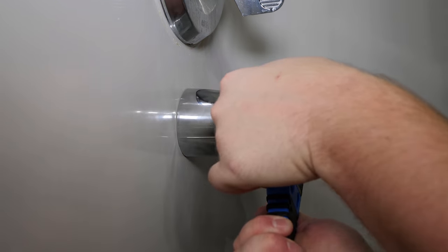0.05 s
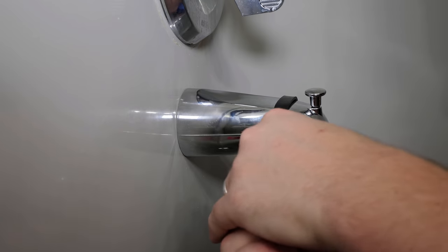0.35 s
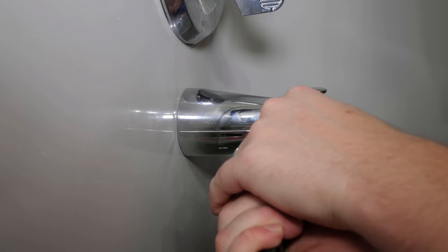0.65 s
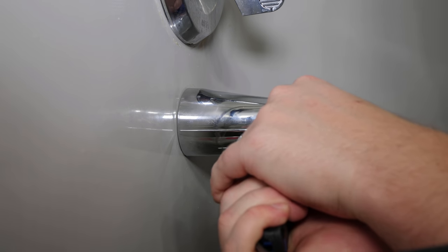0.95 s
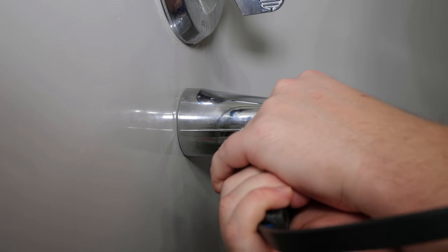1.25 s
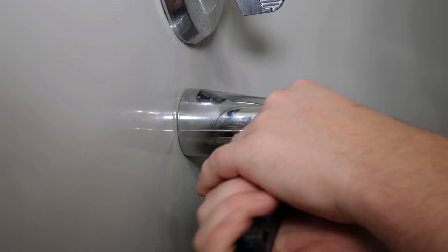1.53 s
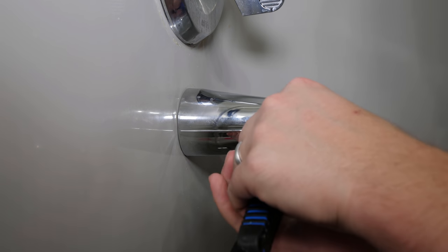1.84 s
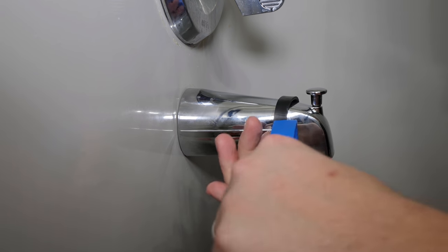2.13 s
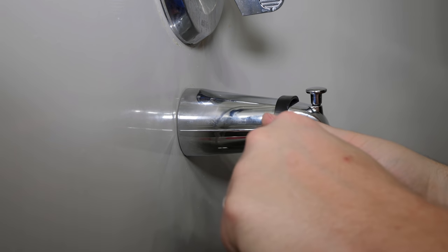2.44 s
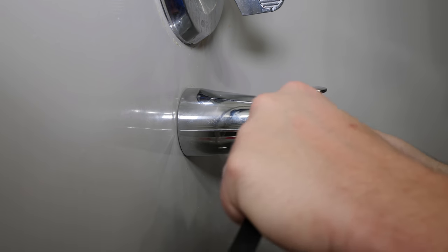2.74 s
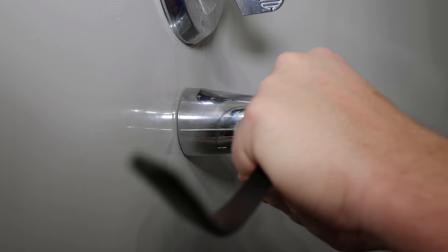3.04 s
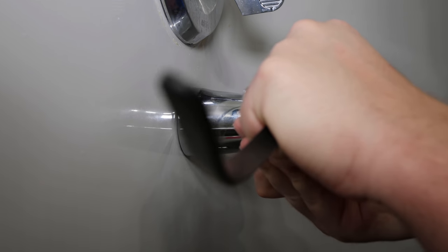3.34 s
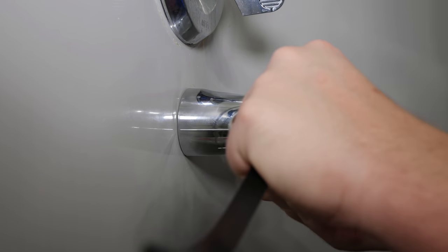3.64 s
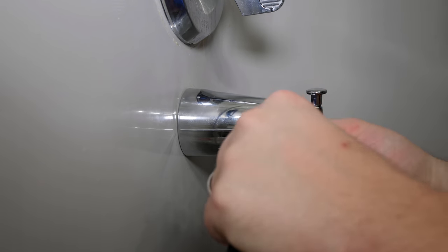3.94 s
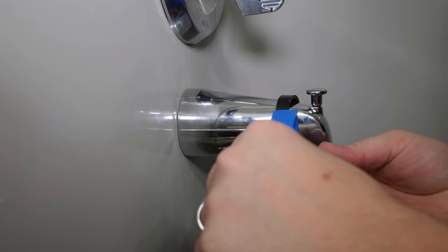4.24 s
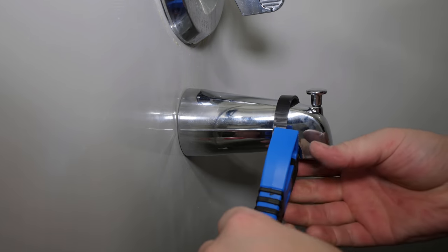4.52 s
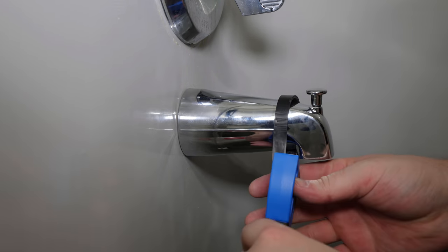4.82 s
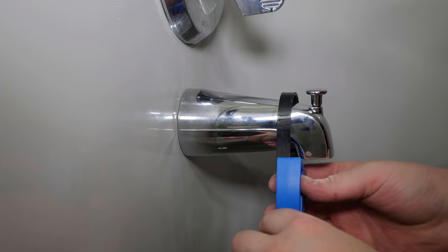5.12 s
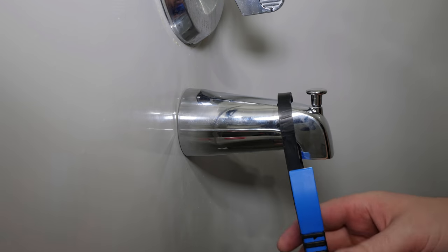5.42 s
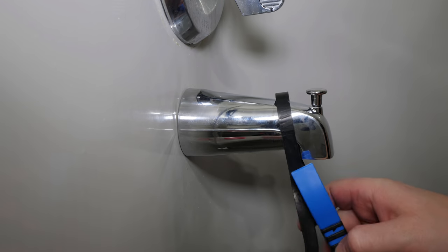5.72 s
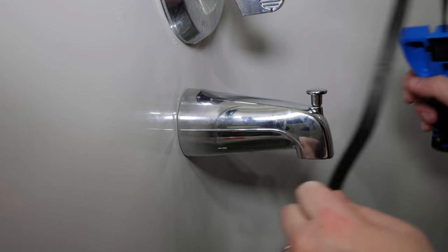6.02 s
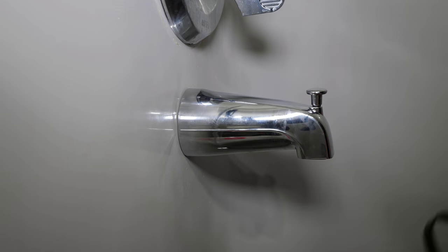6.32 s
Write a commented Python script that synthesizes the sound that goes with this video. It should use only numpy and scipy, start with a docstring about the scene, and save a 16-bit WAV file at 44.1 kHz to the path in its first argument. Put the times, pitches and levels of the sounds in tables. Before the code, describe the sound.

A rubber strap wrench creaks and ticks on a metal tub spout, with hand rubs, soft knocks and hollow chinks in a small bathroom.

```python
"""Short rubbery creaks and plastic ticks, close to the microphone in a small bathroom: a strap wrench
is tightening a chrome tub spout. The loaded strap slips and jolts the pipe, the handle chatters, and
hands rub and bump the tool. The hollow spout chinks as the wrench is reset and pulled off.
Behind it all, the tub alcove booms softly over a faint room drone."""
import sys
import numpy as np
from scipy import signal
from scipy.fft import rfft, irfft
from scipy.io import wavfile

SR = 44100
rng = np.random.default_rng(int(sys.argv[2]) if len(sys.argv) > 2 else 0)


def dump(signal):
    """Clip the signal to [-1, 1] and save it as 16-bit WAV at the path in sys.argv[1]."""
    limited = np.clip(np.atleast_2d(signal).T, -1, 1)
    pcm = np.round(limited * 32767).astype(np.int16)
    wavfile.write(sys.argv[1], SR, pcm)


N = 285327

# Event levels are set ahead of the mix gains and the room.
# the strap slips under load and jolts the pipe:
# (time [s], creak level [dB], length [s], dull above [Hz], jolt level [dB], jolt centre [Hz])
STRAP_SLIPS = [(0.073, -43.5, 0.012, 2600, -61, 1030), (0.095, -46, 0.017, 3500, -58.5, 288),
               (0.325, -53.5, 0.017, 2600, -54, 164), (0.518, -58, 0.016, 5000, -50.5, 1400),
               (0.567, -41, 0.024, 1810, -45.5, 305), (0.633, -37.5, 0.022, 2800, -49, 890),
               (0.648, -38, 0.03, 3340, -46.5, 320), (0.764, -49.5, 0.0059, 900, -46, 254),
               (0.798, -57.5, 0.009, 1010, -54.5, 480), (0.971, -51.5, 0.0081, 694, -48.5, 736),
               (1.257, -48.5, 0.011, 500, -54.5, 220), (1.2677, -48.5, 0.01, 2290, -56.5, 1100),
               (1.288, -51, 0.018, 2480, -56, 440), (1.306, -54.5, 0.025, 2000, -49.5, 205),
               (1.89, -55.5, 0.049, 6190, -55.5, 570), (3.809, -48, 0.037, 1960, -54, 224),
               (3.835, -37, 0.024, 1930, -37, 350), (3.869, -45, 0.026, 2000, -44, 440),
               (4.39, -59, 0.0032, 700, -57, 244), (4.449, -59, 0.016, 700, -55.5, 274),
               (5.844, -63, 0.036, 2500, -54.5, 516), (6.304, -47, 0.027, 1600, -49, 270),
               (6.398, -55.5, 0.062, 1500, -55, 480)]
# the slack strap whisks over the chrome: (time [s], level [dB], length [s])
STRAP_WHISKS = [(4.093, -65, 0.014), (4.675, -65.5, 0.026), (5.410, -65.5, 0.018), (5.697, -59, 0.044),
                (5.837, -55, 0.033), (6.447, -46, 0.003)]
# the plastic handle ticks: (time [s], level [dB])
HANDLE_TICKS = [(.020, -60.5), (0.1533, -48), (0.172, -50.5), (0.2037, -48), (.210, -55), (0.5208, -53.5),
                (.8595, -60), (1.3866, -47.5), (1.465, -58.5), (1.5051, -53), (1.554, -55.5), (1.5896, -52),
                (1.6736, -57.5), (1.713, -60), (2.4439, -59.5), (3.045, -73), (3.231, -71), (3.4218, -70),
                (3.509, -67.5), (3.5768, -61), (4.019, -62.5), (4.1, -65), (6.26, -53.5)]
# hands and tool bump the spout: (time [s], level [dB], centre [Hz], shudder [s])
SPOUT_BUMPS = [(.976, -47.5, 195, 0.0035), (0.996, -48.5, 276, 0.026), (1.309, -50.5, 229, 0.0098),
               (1.326, -51, 480, 0.03), (2.1588, -41.5, 880, 0.013), (2.165, -53.5, 605, 0.047),
               (2.18, -41.5, 211, 0.016), (2.367, -58, 162, 0.023), (2.9161, -63.5, 274, 0.007),
               (4.522, -59.5, 212, 0.0081), (4.557, -58, 217, 0.02), (4.734, -60.5, 206, 0.012),
               (4.9435, -55.5, 250, 0.024), (4.971, -56.5, 235, 0.043), (5.906, -48.5, 910, 0.021),
               (5.928, -51, 613, 0.016), (5.935, -49.5, 203, 0.021), (6.0743, -57, 235, 0.0074),
               (6.131, -56.5, 244, 0.055), (6.205, -54.5, 550, 0.25), (6.345, -47.5, 466, 0.067)]
# the wrench touches the spout:
# (time [s], level [dB], best excited [Hz], spread [octaves], free ring time [share], crack to ring [dB])
SPOUT_CHINKS = [(2.1585, -44, 4780, 0.3, 0.58, -4.5), (2.1588, -46, 10400, 0.23, 0.9, -2.5),
                (2.445, -62.5, 3000, 0.25, 0.43, -10), (4.5535, -61, 4500, 0.79, 0.8, -8),
                (5.8802, -45.5, 3120, 0.093, 1, -21), (5.882, -58, 6700, 0.29, .8, -7),
                (5.906, -43.5, 1900, 0.58, 1, -10), (5.906, -59, 6140, 0.29, 0.39, -3),
                (5.924, -49, 6400, 0.31, 1, -9), (5.927, -50, 820, 0.15, 0.85, -13)]
# a hand slides to a new grip: (fastest at [s], rise [s], fall [s], hiss [dB], scuff [dB], flex [dB])
HAND_STROKES = [(.27, 0.24, 0.24, -59.5, -60.5, -64), (.72, 0.2, 0.12, -68.5, -57.5, -65),
                (1.31, 0.12, 0.3, -68, -64.5, -69), (1.57, 0.051, 0.11, -58, -62, -59.5),
                (1.845, 0.062, 0.26, -56, -70, -63), (2.061, 0.064, 0.14, -51, -60, -55.5),
                (2.345, 0.026, 0.16, -67, -67.5, -66.5), (3.15, 0.13, .14, -83, -88, -68.5),
                (3.52, 0.05, 0.14, -76, -67, -86), (4.108, 0.06, 0.039, -53.5, -71, -60.5),
                (4.28, 0.55, 0.44, -65.5, -70, -66.5), (5.39, 0.15, 0.11, -68, -67.5, -85),
                (5.78, 0.44, 0.27, -70, -76, -60.5), (6.181, 0.11, 0.11, -56, -59.5, -80),
                (6.441, 0.13, 0.068, -54.5, -52, -50)]
# hands that only hold the tool: (hiss [dB], scuff [dB], flex [dB])
RESTING_GRIP_DB = (-80, -73.5, -80)

# modes of the hollow spout: (frequency [Hz], level [dB], t60 [s])
SPOUT_MODES = [(830, -5, .35), (900, -7, .3), (1800, 1, .64), (1938, -3, .66), (3120, 1, .31),
               (3227, -2, .45), (3553, -13, .45), (4113, -4, .2), (4501, -3, .28), (4527, -6, .33),
               (4678, -4, .28), (5087, -7, .28), (5157, -9, .2), (5319, -10, .14), (6126, -11, .17),
               (6923, -10, .36), (7306, -8, .2), (7916, -3, .32), (8250, -11, .2), (9200, -13, .2),
               (10200, -4, .14), (10700, -8, .14)]
# standing waves of the tub alcove: (frequency [Hz], peak gain [dB], t60 [s])
ALCOVE_MODES = [(192.7, -6, 0.32), (227.7, 9, 0.19), (283, -11, 0.26), (375, 2, 0.31), (460.6, 10, 0.28),
                (616, 0.5, 0.031), (686.6, -5.5, 0.11), (1100, -8, 0.071), (1160, -17, 0.25),
                (1475, -17, 0.14)]
# faint ring of the spout under sliding hands: (frequency [Hz], width [Hz], peak gain [dB])
RUBBED_SPOUT_PEAKS = [(5130, 260, 1), (8200, 260, -3)]

# tone colours: (frequency [Hz], relative level [dB])
ROOM_TONE_COLOUR = [(15, -34), (25, -21), (148, -62), (173, -6), (305, -25.5), (349, 1.5), (399, -11.5),
                    (457, -22), (495, -14), (582, -10), (1080, -23.5), (1490, -19.5), (2360, -26.5),
                    (5580, -21.5), (15500, -24.5)]  # the still bathroom
PORT_DIFFERENCE = [(100, -39), (300, 3), (600, 0.5), (1200, 7.5), (2200, 15), (5000, 13.5), (9000, 12.5),
                   (15000, -11)]  # how much the two microphone ports differ
SKIN_COLOUR = [(300, -18.5), (1000, -4), (1400, -6), (2200, 2), (3500, 3), (5200, 0), (7000, 1),
               (10000, -2.5), (15000, -1.5)]  # sliding skin
SCUFF_COLOUR = [(40, -49), (150, -4), (350, 7), (650, 1.5), (1300, -4.5), (2000, 3), (3200, -11),
                (5000, -10.5), (12000, -20)]  # catching skin
FLEX_COLOUR = [(25, -49), (60, -38), (85, -20.5), (105, -9.5), (130, 2.5), (210, 7.5), (300, -5.5),
               (500, -19.5), (1200, -28)]  # the flexing pipe
WALL_COLOUR = [(30, -32), (70, -10), (125, -5), (210, -7), (1000, -7.5), (1400, -21.5), (15000, 39)]  # the shaken wall panel
HANDLE_COLOUR = [(100, -17), (250, -4.5), (800, -2), (1500, 2), (2150, 4), (3200, 1), (4500, -11.5),
                 (8000, -14.5), (15000, -20)]  # plastic parts
WHISK_COLOUR = [(500, -39), (3000, -17), (5000, -15.5), (7300, -4), (9000, -16), (15000, -23)]  # slack rubber
CREAK_COLOUR = [(40, -30), (120, -18), (230, 1), (400, -1.5), (700, -1.5), (1200, -3), (2000, -2),
                (4000, -11.5), (8000, -14), (15000, -16)]  # loaded rubber


def undb(db):
    """Decibels to gain."""
    return 10 ** (np.asarray(db) / 20)


def unit(x):
    """Scale to an energy of one."""
    return x / np.sqrt(np.sum(x ** 2) + 1e-20)


def colour(x, points, size=2048):
    """Causal filter of unit energy through (frequency [Hz], level [dB]) points."""
    hz, db = np.transpose(points)
    bin_hz = np.fft.rfftfreq(size, 1 / SR)
    gain = undb(np.interp(np.log(bin_hz + 1), np.log(hz), db))
    cepstrum = irfft(np.log(gain))
    cepstrum[1:size // 2] *= 2  # fold to minimum phase
    cepstrum[size // 2 + 1:] = 0
    response = irfft(np.exp(rfft(cepstrum)))
    return signal.oaconvolve(x, unit(response))[:len(x)]


def dull(x, hz):
    """Gentle low-pass, as from a softer contact."""
    g = np.tan(np.pi * min(hz, SR / 3) / SR)
    return signal.lfilter([g, g], [1 + g, g - 1], x)


def resonate(x, peaks):
    """Add narrow resonances: (frequency [Hz], width [Hz], peak gain [dB])."""
    return x + sum(undb(db) * signal.lfilter(*signal.iirpeak(hz, hz / width, fs=SR), x)
                   for hz, width, db in peaks)


def grains(size, rate):
    """Tiny slips at random moments with uneven sizes; rms one."""
    chance = min(rate / SR, 1)
    return (rng.random(size) < chance) * rng.standard_normal(size) / np.sqrt(chance)


def wander(rate):
    """Random drift with a spread near one and `rate` new values a second."""
    knots = rng.standard_normal(N // 100)
    return np.interp(np.arange(N) / SR * rate, np.arange(len(knots)), knots)


def place(track, at_s, x, db, length_s=0):
    """Add a sound whose level is its rms over length_s plus a fiftieth of a second."""
    start = max(int(at_s * SR), 0)
    x = unit(x) * undb(db) * np.sqrt((length_s + 1 / 50) * SR)
    track[start:start + len(x)] += x[:max(N - start, 0)]


def room_tone(level_db=-69.5, side_db=-7, side_hz=1200, waver_db=-1.0):
    """Far background: a faint low drone in the centre, under smooth, wider hiss."""
    mid, side = (colour(rng.standard_normal(N), ROOM_TONE_COLOUR) for _ in range(2))
    side = undb(side_db) * (side - dull(side, side_hz))
    return undb(level_db + waver_db * wander(rate=4.12)) * np.array([mid + side, mid - side])


def alcove(x):
    """Standing waves around the tub lift a few pitches and let them linger."""
    return resonate(x, [(hz, np.log(1000) / (np.pi * t60), db) for hz, db, t60 in ALCOVE_MODES])


def reflections(x, t, t60_low=0.25, t60_high=0.1, early_db=2, early_s=0.0065, diffuse_hz=650):
    """Near hard walls return dense echoes and a short tail, mostly above the strong standing waves."""
    noise = rng.standard_normal(len(t))
    low = dull(noise, hz=1800)
    tail = low * undb(-60 * t / t60_low) + (noise - low) * undb(-60 * t / t60_high)
    early = rng.standard_normal(len(t)) * np.exp(-t / early_s)
    response = unit(tail * (t > .004)) + undb(early_db) * unit(early * (t > .001))
    return signal.oaconvolve(x, unit(response - dull(response, diffuse_hz)))[:N]


def bathroom(sources, t, side_db=-12):
    """Each source has its own paths to the walls; the two microphone ports hear the echoes differently."""
    mid = sum(sound + undb(wet_db) * reflections(sound, t) for sound, wet_db in sources)
    side = undb(side_db) * colour(reflections(mid, t), PORT_DIFFERENCE)
    return np.array([mid + side, mid - side])


def hand_strokes(roundness=1.5):
    """Each stroke speeds up and slows, swelling hiss, scuff and flex over the stir of a resting grip."""
    power = undb(RESTING_GRIP_DB)[:, None] ** 2
    for peak_s, rise_s, fall_s, *levels_db in HAND_STROKES:
        since = np.arange(N) / SR - peak_s
        swell_s = np.where(since < 0, rise_s, fall_s)
        speed = np.exp(-np.abs(since / swell_s) ** roundness)
        power = power + np.outer(undb(levels_db), speed) ** 2
    return np.sqrt(power)


def hand_rub(hiss_db=2, scuff_db=-2, flex_db=-1, unsteady_db=1.9):
    """Sliding skin hisses, coarser catches scuff, and the shifting grip flexes the pipe."""
    pressure = undb(unsteady_db * wander(rate=45))
    sliding, catching, leaning = hand_strokes()
    skin = colour(grains(N, rate=25000), SKIN_COLOUR)
    hiss = undb(hiss_db) * sliding * resonate(skin, RUBBED_SPOUT_PEAKS)
    scuff = undb(scuff_db) * catching * colour(grains(N, rate=5000), SCUFF_COLOUR)
    flex = undb(flex_db) * leaning * colour(grains(N, rate=1500), FLEX_COLOUR)
    return pressure * (hiss + scuff + flex)


def wall_bumps(t, shudder=0.16, band_ratio=1.315, jolt_lag_s=0.00289):
    """Soft blows and strap jolts run down the pipe and shake the wall; softer contacts sound lower."""
    out = np.zeros(N)
    jolts = [(at_s + jolt_lag_s, db, hz, length_s) for at_s, _, length_s, _, db, hz in STRAP_SLIPS]
    for at_s, db, hz, shudder_s in SPOUT_BUMPS + jolts:
        push = (t == 0) + shudder * rng.standard_normal(len(t)) * np.exp(-t / shudder_s)
        contact_band = signal.butter(2, [hz / band_ratio, hz * band_ratio], "bandpass", fs=SR)
        thud = signal.lfilter(*contact_band, colour(push, WALL_COLOUR))
        place(out, at_s, dull(thud, hz), db, shudder_s / 2)
    return out


def handle_ticks(t, chatter=0.17, chatter_s=0.0019):
    """The plastic parts give a sharp tick and a brief chatter."""
    out = np.zeros(N)
    for at_s, db in HANDLE_TICKS:
        push = (t == 0) + chatter * rng.standard_normal(len(t)) * np.exp(-t / chatter_s)
        place(out, at_s, colour(push, HANDLE_COLOUR), db)
    return out


def drive_db(hz, centre_hz, octaves, leak_db=-25):
    """A contact point drives the spout best around one frequency and only weakly far from it."""
    bell_curve = np.exp(-.5 * (np.log2(hz / centre_hz) / octaves) ** 2)
    return 20 * np.log10(bell_curve + undb(leak_db))


def spout_chinks(t, crack_s=0.012, crack_widening=2.2):
    """Each touch of the wrench rings a range of the spout's modes; a hand on the metal damps the ring."""
    out = np.zeros(N)
    for at_s, db, centre_hz, octaves, ring_share, crack_db in SPOUT_CHINKS:
        ring = np.zeros(len(t))
        for hz, mode_db, t60 in SPOUT_MODES:
            start_db = mode_db + drive_db(hz, centre_hz, octaves)
            ring += undb(start_db - 60 * t / (t60 * ring_share)) * np.sin(2 * np.pi * hz * t)
        # the jaw chatters on the chrome for a moment, over a wider range than the ring
        chatter = rng.standard_normal(len(t)) * np.exp(-t / crack_s)
        crack_band = [(hz, drive_db(hz, centre_hz, octaves * crack_widening)) for hz, _, _ in SPOUT_MODES]
        crack = colour(chatter, [(100, -45)] + crack_band + [(15000, -15)])
        place(out, at_s, unit(ring) + undb(crack_db) * unit(crack), db, length_s=0.013)
    return out


def slip_run(t, length_s, rate, release_s):
    """A run of micro-slips dies away once the strap grips again."""
    return grains(len(t), rate) * np.exp(-np.maximum(t - length_s, 0) / release_s)


def strap_creaks(t):
    """Close to the microphone, loaded rubber creaks in short runs of slips; slack rubber only whisks."""
    out = np.zeros(N)
    for at_s, db, length_s, dull_hz, _, _ in STRAP_SLIPS:
        creak = colour(slip_run(t, length_s, rate=4600, release_s=0.0035), CREAK_COLOUR)
        place(out, at_s, dull(creak, dull_hz), db, length_s)
    for at_s, db, length_s in STRAP_WHISKS:
        whisk = colour(slip_run(t, length_s, rate=4500, release_s=0.0052), WHISK_COLOUR)
        place(out, at_s, whisk, db, length_s)
    return out


def scene(strap_db=-5.0, handle_db=-5.5, bump_db=-2, rub_db=-1):
    """From beside the tub: knocks fill the alcove, while the close spout and hands arrive mostly direct."""
    ring_t = np.arange(SR // 2) / SR
    t = ring_t[:SR // 4]
    # (sound, reflected level [dB])
    sources = [(undb(strap_db) * alcove(strap_creaks(t)), -2),
               (undb(handle_db) * alcove(handle_ticks(t)), 1),
               (undb(bump_db) * alcove(wall_bumps(t)), -3),
               (undb(rub_db) * alcove(hand_rub()), -6),
               (spout_chinks(ring_t), -9)]
    return bathroom(sources, t) + room_tone()


def record(dry, top_hz=15700):
    """The recorder cuts the highest treble steeply."""
    return signal.sosfilt(signal.ellip(12, .2, 70, top_hz, fs=SR, output="sos"), dry)


dry = scene()
out = record(dry)
dump(out)
```